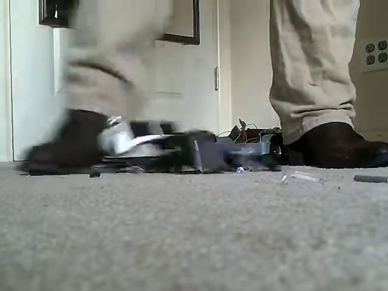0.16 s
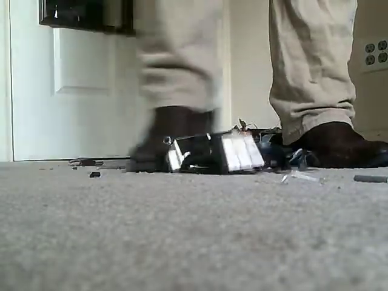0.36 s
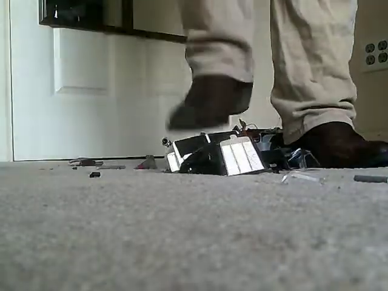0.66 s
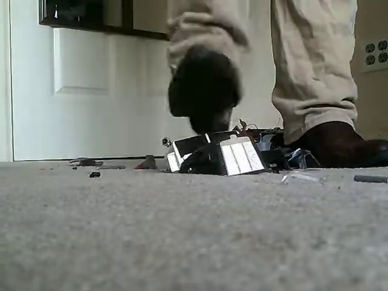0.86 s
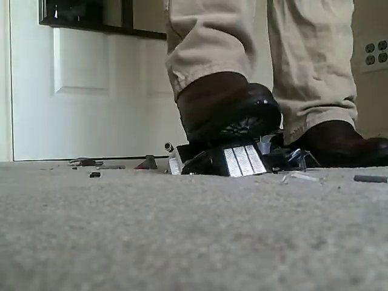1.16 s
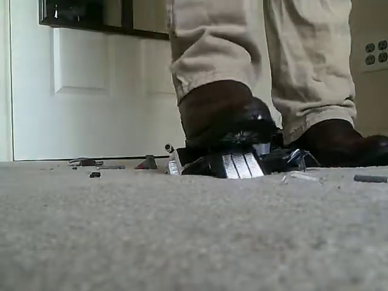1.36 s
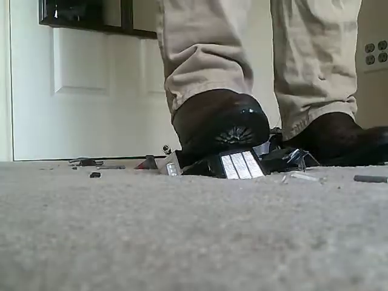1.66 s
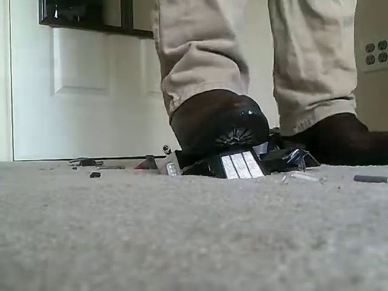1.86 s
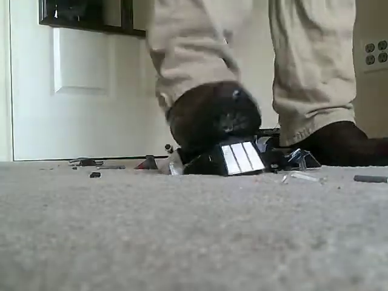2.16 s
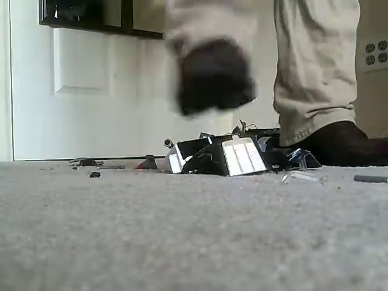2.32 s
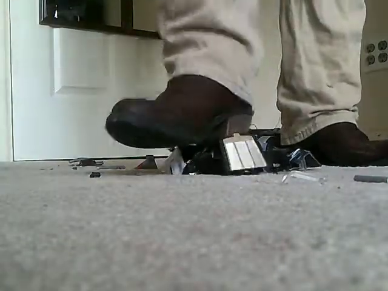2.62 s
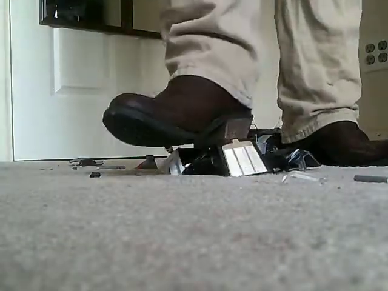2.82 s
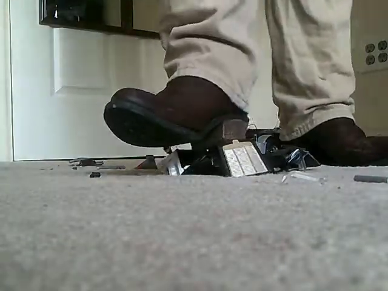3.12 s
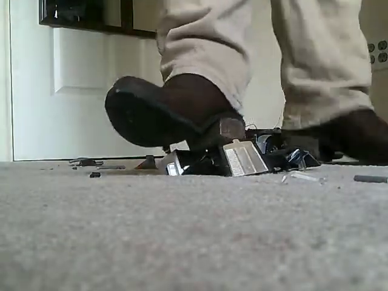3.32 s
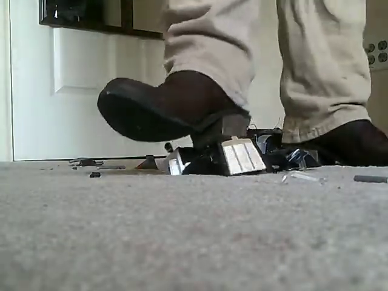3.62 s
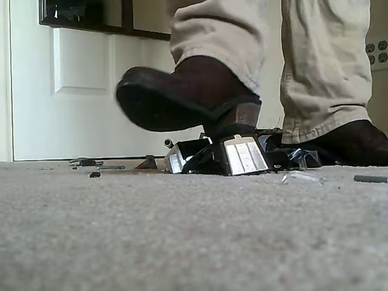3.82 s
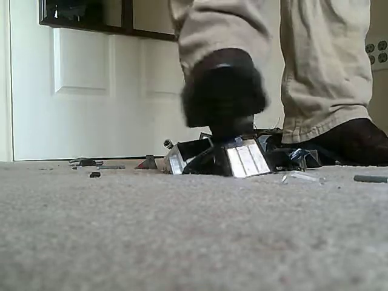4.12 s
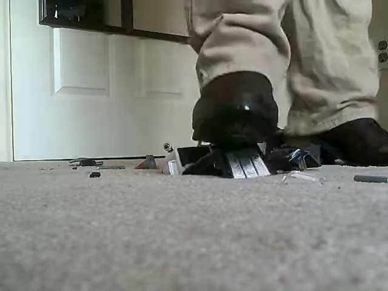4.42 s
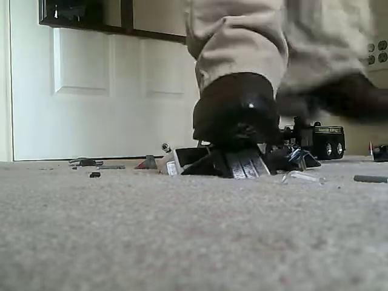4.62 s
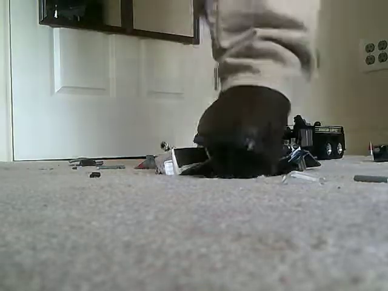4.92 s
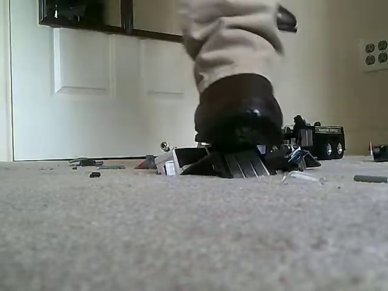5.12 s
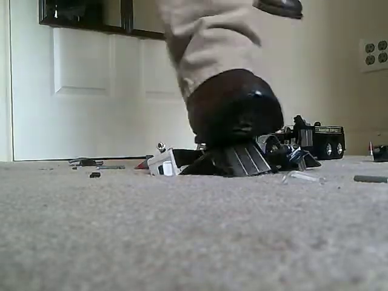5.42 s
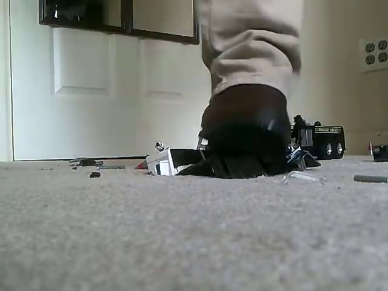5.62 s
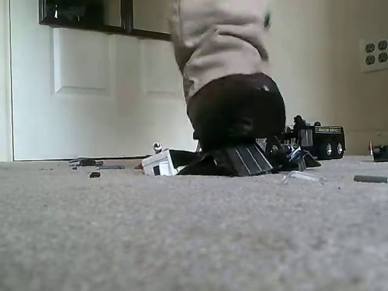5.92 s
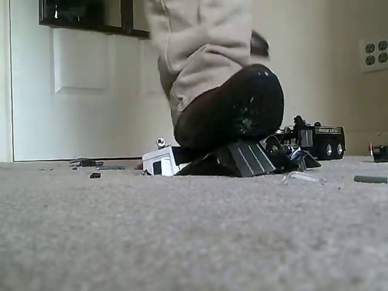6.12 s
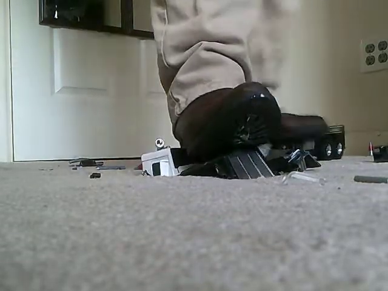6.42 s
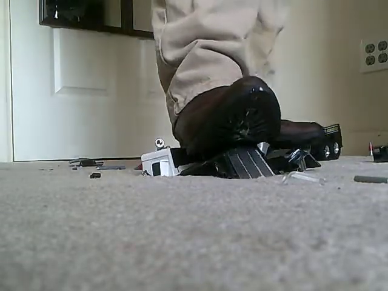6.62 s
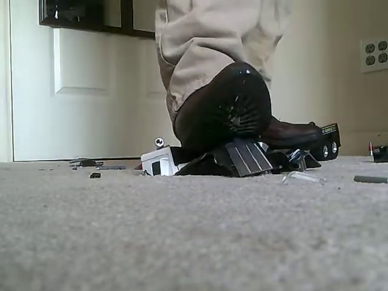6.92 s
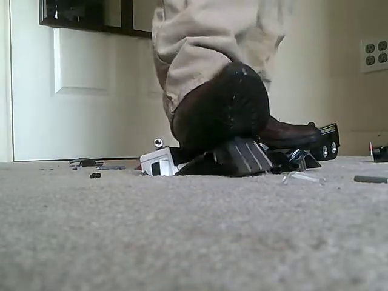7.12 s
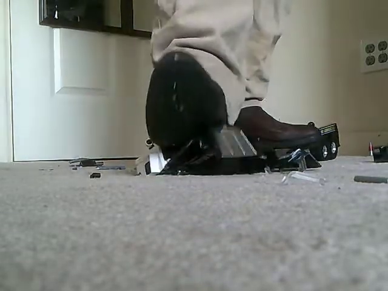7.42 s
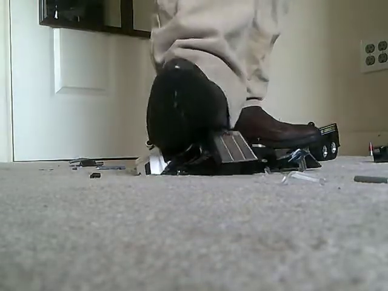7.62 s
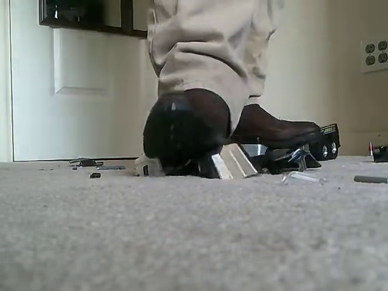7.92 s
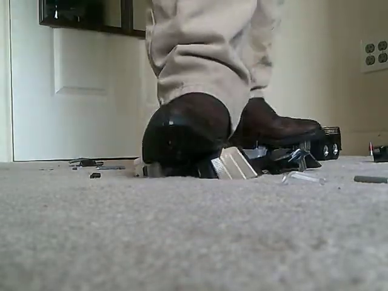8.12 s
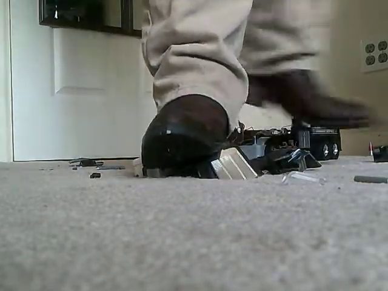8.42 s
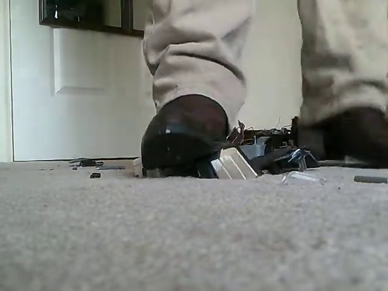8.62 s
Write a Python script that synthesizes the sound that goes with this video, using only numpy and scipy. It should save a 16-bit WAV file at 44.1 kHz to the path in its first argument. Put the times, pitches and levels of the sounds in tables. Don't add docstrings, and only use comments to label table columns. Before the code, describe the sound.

A hollow plastic toy is shoved and crushed under a boot on carpet in a small damped room. Clatter and snaps come first, then a hard stamp, sparse creaky clicks, and a violent, distorted crunching smash about two thirds through. Smaller cracks follow and thin out. A low fan and mains hum runs throughout. The cheap microphone lies close on the floor, boomy and dull on top.

```python
import sys
import numpy as np
from scipy import signal
from scipy.fft import rfft, irfft
from scipy.io import wavfile
from scipy.ndimage import uniform_filter1d

SR = 44100
rng = np.random.default_rng(int(sys.argv[2]) if len(sys.argv) > 2 else 0)


def makeup_ratio(level_db):
    decades = np.asarray(level_db, float) / 20
    return 10 ** decades


def dump_mix(stems):
    frames = np.atleast_2d(stems).T
    limited = np.clip(frames, -1, 1)
    pcm = np.round(limited * 32767).astype(np.int16)
    wavfile.write(sys.argv[1], SR, pcm)


N = 386316
TIME = np.arange(N) / SR


def noise(count=N + SR):
    return rng.standard_normal(count)


def colour(x, points):
    hz, db = np.transpose(points)
    size = 8192
    grid = np.maximum(np.fft.rfftfreq(size, 1 / SR), 1)
    ceps = irfft(np.interp(np.log(grid), np.log(hz), db) * np.log(10) / 20)
    ceps[1:size // 2] *= 2
    ceps[size // 2 + 1:] = 0
    impulse = irfft(np.exp(rfft(ceps)))
    return signal.fftconvolve(x, impulse)[:len(x)]


def band(x, lo_hz, hi_hz):
    y = signal.sosfilt(signal.butter(2, [lo_hz, hi_hz], "band", fs=SR, output="sos"), x)
    return y / np.sqrt(np.mean(y ** 2))


def walk(rate_hz):
    k = int(SR / rate_hz)
    held = np.repeat(noise(N // k + 1), k)
    return uniform_filter1d(uniform_filter1d(held, k), k)[:N]


def fade(t, t60_s):
    return np.exp(-np.log(1000) * t / max(t60_s, .003))


def onset(t, rise_s):
    return 1 - np.exp(-t / rise_s)


def modes(hz, db, t, phase=0):
    return makeup_ratio(db) @ np.sin(2 * np.pi * np.outer(hz, t) + phase)


def swell(s, db, rise_s, fall_s):
    corners_s = [s - 3 * max(rise_s, .002), s, s + 3 * max(fall_s, .002)]
    return makeup_ratio(np.interp(TIME, corners_s, [db - 90, db, db - 90]))


def add_at(out, s, sound):
    i = int(s * SR)
    out[i:i + len(sound)] += sound


# start_s, level_db, pitch_hz, crack_db (against the peak), t60_s
SNAPS = [(0.319, -14.5, 1055, -31, 0.032), (1.18, -9, 1020, -33, 0.021), (1.474, -11, 733, -8, 0.039),
         (2.107, -10.5, 784, -28, 0.057), (2.539, -22.5, 525, -37, 0.076), (3.493, -22, 353, -49, 0.021),
         (4.111, -29.5, 930, -24, 0.034), (4.793, -23, 696, -41, 0.019), (4.805, -15, 957, -52, 0.018),
         (5.514, -15, 1010, -31.5, 0.087), (6.419, -20, 863, -36, 0.035), (7.937, -23, 947, -40, 0.087),
         (8.174, -34, 625, -44.5, 0.028)]
CRACKS = [(0.207, -20, 834, -28, 0.12), (1.31, -18, 837, -28.5, 0.015), (4.227, -33, 810, -20, 0.033),
          (4.259, -18, 716, -44, 0.015), (4.328, -29.5, 1045, -30, 0.04), (4.833, -21, 764, -54, 0.083),
          (5.561, -31, 1100, -7.5, 0.094), (5.964, -4, 941, -4.5, 0.14), (5.974, 10, 831, -14, 0.024),
          (5.985, 0.5, 731, -8, 0.028), (5.997, 3, 739, -14.5, 0.066), (6.653, -13, 735, -31, 0.048),
          (7.977, -15, 658, -49.5, 0.059)]
KNOCKS = [(0.057, -20.5, 1177, -24, 0.17), (0.182, -26.5, 764, -27, 0.37), (0.25, -19, 800, -14, 0.1),
          (0.301, -21, 974, -13, 0.047), (0.917, -19.5, 996, -24, 0.12), (1.463, 2.5, 880, -14.5, 0.047),
          (3.689, -20, 893, -43, 0.019), (5.352, -18.5, 775, -25, 0.03), (5.676, 2, 848, -24.5, 0.023),
          (6.009, -7, 1106, -9.5, 0.045), (6.031, -8, 473, -12.5, 0.045), (6.339, -23, 806, -30, 0.1),
          (6.351, -16, 1230, -27, 0.088), (6.368, -2.5, 1024, -21, 0.061), (6.389, -5.5, 975, -18.5, 0.028),
          (6.464, -9, 920, -34, 0.06), (6.474, -12, 762, -35, 0.057), (6.529, -21, 576, -28, 0.2),
          (6.688, -15, 650, -62, 0.054), (6.713, -20, 700, -25, 0.079), (6.955, -32, 1000, -32.5, 0.15),
          (7.084, -33.5, 299, -51.5, 0.041), (7.146, -24, 705, -37, 0.055), (8.049, -27, 746, -42, 0.066)]
CLATTER = [(0.042, -17, 973, -19.5, 0.064), (0.28, -19, 1140, -25, 0.078), (0.431, -33, 945, -26, 0.067),
           (0.979, -11.5, 435, -29, 0.023), (1.282, -26, 895, -37, 0.02), (1.29, -33, 766, -10.5, 0.095),
           (1.939, -30.5, 770, -31, 0.082), (2.129, -2, 923, -34.5, 0.019),
           (2.156, -20.5, 414, -19.5, 0.088), (2.216, -28, 856, -19, 0.023), (2.59, -22.5, 700, -29, 0.037),
           (3.657, -21, 310, -47.5, 0.027), (4.185, -31, 720, -35, 0.083), (4.928, -19.5, 840, -35, 0.036),
           (5.063, -6.5, 920, -24, 0.015), (5.141, -8.5, 795, -23, 0.073), (5.323, -15.5, 493, -36, 0.025),
           (5.893, -15.5, 418, -37, 0.042), (5.921, -9, 950, -19, 0.042), (5.945, 3, 1020, -12.5, 0.095),
           (6.62, -14, 955, -18.5, 0.041), (6.774, -23.5, 520, -15.5, 0.066),
           (7.249, -11.5, 897, -15.5, 0.039), (8.757, -19.5, 915, -30.5, 0.13)]


def breaks():
    kinds = [(SNAPS, 0.15), (CRACKS, 0.32), (KNOCKS, 0.41), (CLATTER, 0.5)]
    events = sorted(tuple(row) + (spread,) for rows, spread in kinds for row in rows)
    shell_fall_db = 16
    out, t = np.zeros(N + SR), np.arange(SR // 6) / SR
    hiss = noise()
    crack_low, crack_top = band(hiss, 1500, 4600), band(hiss, 4500, 8000)
    body_noise = band(noise(), 280, 2000)
    rattle = makeup_ratio(3 * np.tanh(band(noise(), 40, 200)))
    grit = band(noise(), 1300, 4300) * rattle ** 2
    place = np.linspace(-1, 1, 13)
    lucks = rng.standard_normal((len(events), 3, 13))
    for (s, db, hz, crack_db, t60_s, spread), luck in zip(events, lucks):
        now = slice(int(s * SR), int(s * SR) + len(t))
        spread = np.clip(2.2 * spread ** 2 + max(db + 2, 0) / 20, .05, .9)
        pitch_hz = hz * np.exp(spread * (place + 0.063 * luck[0] * (place != 0)))
        mode_db = 3.3 * luck[1] - shell_fall_db * np.abs(place)
        ring = 0.42 * modes(pitch_hz, mode_db, t * (1 + 0.53 * t), 2 * luck[2, :, None])
        body = (0.064 + 0.64 * spread) * body_noise[now]
        ring = (ring + body) * rattle[now] * fade(t, t60_s) * onset(t, 0.0011)
        flaps = modes(2500 * np.exp(0.24 * luck[2]), luck[1], t, 2 * luck[0, :, None])
        flaps *= fade(t, 0.015) * onset(t, 0.00073)
        split = 0.2 * crack_low[now] + makeup_ratio(0.16 * db - 0.5) * crack_top[now]
        split *= 0.73 * (1.1 * fade(t, 0.004) + 0.22 * fade(t, t60_s))
        crack = (split + 0.76 * grit[now] * fade(t, 0.95 * t60_s)) * onset(t, 0.00052)
        out[now] += makeup_ratio(db) * (ring + makeup_ratio(crack_db + 13.5) * (crack + 0.49 * flaps))
    return out[:N]


# start_s, level_db, pitch_hz, t60_s
CHIPS = [(0.0417, -20.5, 1970, 0.037), (0.0464, -22.5, 2320, 0.049), (0.0614, -24, 1970, 0.043),
         (0.0774, -29, 1970, 0.044), (0.1444, -47, 2010, 0.04), (0.174, -40, 2380, 0.04),
         (0.2117, -26, 2470, 0.04), (0.2487, -20, 2930, 0.04), (0.2545, -35, 2440, 0.037),
         (0.2784, -18.5, 2310, 0.045), (0.3003, -22, 2900, 0.04), (0.3074, -26, 2400, 0.04),
         (0.916, -29, 2750, 0.04), (0.9195, -26, 2420, 0.044), (0.9566, -36, 2950, 0.035),
         (0.979, -25, 2340, 0.046), (1.0094, -50, 2330, 0.04), (1.29, -51, 1900, 0.04),
         (1.29, -39, 1900, 0.034), (1.3114, -47, 1900, 0.04), (1.3513, -49, 2390, 0.037),
         (1.4626, -8, 2797, 0.025), (1.4837, -22, 2440, 0.036), (1.941, -40, 2000, 0.049),
         (2.1107, -26, 2680, 0.035), (2.1296, -20, 2350, 0.04), (2.1568, -24, 2240, 0.045),
         (2.2134, -36, 2010, 0.04), (2.271, -43, 2060, 0.054), (2.5443, -30, 1900, 0.033),
         (2.5628, -33, 2280, 0.045), (2.5774, -42, 2290, 0.036), (2.5905, -33, 2320, 0.043),
         (2.6723, -46, 1930, 0.04), (3.654, -49, 2290, 0.04), (3.691, -42, 1900, 0.04),
         (4.1075, -44, 2060, 0.05), (4.1584, -54, 1980, 0.04), (4.1839, -45, 1950, 0.044),
         (4.2044, -47, 2060, 0.04), (4.2602, -47, 2010, 0.04), (4.2747, -37, 2040, 0.032)]
LATE_CHIPS = [(4.8534, -46, 1600, 0.04), (4.9265, -31.5, 1600, 0.046), (5.0627, -21, 1900, 0.04),
              (5.0774, -32, 1900, 0.04), (5.1554, -27, 1870, 0.044), (5.3226, -33.5, 1606, 0.025),
              (5.3528, -34.5, 1810, 0.033), (5.369, -48, 1600, 0.04), (5.5294, -35.5, 1680, 0.04),
              (5.5608, -36, 2300, 0.026), (5.5744, -44, 2390, 0.04), (5.689, -20, 1880, 0.032),
              (5.893, -36, 1875, 0.04), (5.9199, -15, 1624, 0.046), (6.37, -10, 2750, 0.038),
              (6.3858, -11, 1700, 0.04), (6.4017, -20, 1720, 0.04), (6.4194, -34, 1620, 0.04),
              (6.4566, -20, 1770, 0.045), (6.4649, -13.5, 1780, 0.045), (6.485, -19, 1620, 0.053),
              (6.5287, -24, 1620, 0.052), (6.6334, -28, 2030, 0.049), (6.687, -32, 1910, 0.04),
              (6.7116, -31, 1910, 0.04), (6.772, -29.5, 1720, 0.048), (6.7852, -39, 1730, 0.04),
              (6.9551, -44, 1590, 0.051), (6.9684, -42, 1610, 0.045), (7.1457, -44, 1600, 0.038),
              (7.1886, -47, 1600, 0.048), (7.2489, -19, 1870, 0.02), (7.264, -39, 2020, 0.035),
              (7.9374, -30.5, 1960, 0.03), (7.9543, -35, 1910, 0.017), (8.0247, -44, 1910, 0.04),
              (8.0423, -41, 1700, 0.031), (8.083, -50, 1810, 0.04), (8.1055, -53, 1780, 0.036),
              (8.1718, -51, 1790, 0.04), (8.2295, -50, 1710, 0.04)]


def chips():
    level_db, tilt_db, fall_db = -4.5, 5, 12.5
    out, t = np.zeros(N + SR), np.arange(SR // 8) / SR
    rows = list(CHIPS) + list(LATE_CHIPS)
    rattle = makeup_ratio(3 * np.tanh(band(noise(), 60, 300)))
    for (s, db, hz, t60_s), luck in zip(rows, rng.standard_normal((len(rows), 3, 16))):
        now = slice(int(s * SR), int(s * SR) + len(t))
        pitch_hz = np.geomspace(1100, 4700, num=16) * np.exp(.04 * luck[0])
        mode_db = db + level_db + tilt_db * np.log2(pitch_hz / 1500) + 3.3 * luck[1]
        mode_db -= fall_db * np.abs(np.log2(pitch_hz / hz))
        ring = modes(pitch_hz, mode_db, t, 2 * luck[2, :, None]) * rattle[now]
        out[now] += ring * fade(t, t60_s) * onset(t, 0.0012)
    return out[:N]


# start_s,
# level_db, pitch_hz, t60_s
PANELS = [(.043, -25.5, 372, 0.058), (0.209, -22, 2496, 0.071), (0.433, -38, 980, 0.18),
          (.979, -23, 490, 0.019), (1.18, -29, 513, 0.054), (1.282, -30.5, 800, 0.013),
          (1.464, -8.5, 810, 0.038), (1.47, -14.5, 390, 0.039), (2.110, -21.5, 786, .04),
          (2.54, -26.5, 720, 0.024), (5.063, -26, 525, 0.027), (5.142, -18, 560, 0.046),
          (5.142, -17.5, 1075, 0.15), (5.142, -12, 3130, 0.013), (5.515, -19.5, 510, 0.042),
          (5.515, -25, 1041, 0.16), (5.514, -19.5, 3070, 0.013), (5.677, -9.5, 1000, 0.14),
          (5.677, -19.5, 477, 0.033), (6.37, -5, 2720, 0.031), (6.369, -4.5, 918, 0.092),
          (6.625, -33, 2160, 0.3), (6.69, -33, 2110, 0.22), (7.083, -26.5, 400, 0.015),
          (7.146, -27.5, 865, .025), (7.158, -31, 1050, .05), (7.262, -25.5, 1055, 0.045),
          (7.31, -43, 2900, .12), (6.622, -21, 1142, 0.058), (6.374, -10, 798, 0.076),
          (6.635, -31, 2560, .15), (.312, -21.5, 1086, .04), (.93, -30, 1700, 0.071), (.92, -29, 4000, .06),
          (2.133, -20.5, 1484, 0.055), (7.94, -27, 1970, 0.13), (7.938, -29, 548, 0.06),
          (7.938, -34, 1375, 0.07), (8.757, -28, 300, 0.039)]


def panels():
    out, t = np.zeros(N + SR), np.arange(SR // 4) / SR
    stiffening = t * (1 + 0.29 * t)
    for s, db, hz, t60_s in PANELS:
        ring = modes(hz * np.array([.94, 1, 1.075]), db + np.array([-4, 0.5, -5]), stiffening)
        add_at(out, s, ring * fade(t, t60_s))
    return out[:N]


# peak_s, level_db, rise_s, fall_s, brightness_db
CRUNCH = [(.044, -22.5, 0.011, 0.25, 4), (.315, -22.5, 0.21, 0.14, 2.5), (.925, -31.5, 0.013, 0.12, 6.5),
          (1.188, -23, 0.028, 0.052, -20.5), (1.295, -32.5, .012, 0.15, -0.5),
          (2.135, -27.5, 0.004, 0.1, -11), (2.21, -24.5, 0.042, 0.091, -25),
          (2.544, -25.5, 0.014, 0.14, -1.5), (3.656, -32.5, .012, 0.31, -3),
          (4.288, -30.5, 0.14, .026, -18.5), (4.85, -31, 0.45, 0.044, -17),
          (4.934, -24, 0.032, 0.014, -20.5), (5.327, -25, 0.051, 0.16, -9), (5.53, -24.5, .005, 0.16, -27),
          (5.99, -8.5, 0.1, 0.1, -11.5), (6.099, -26.5, 0.066, 0.2, 6.5), (6.374, -3, 0.017, 0.17, -31),
          (6.48, -14.5, 0.15, 0.16, -13), (6.624, -17.5, .008, 0.16, -7),
          (7.149, -23.5, 0.0075, 0.1, -16.5), (7.25, -9.5, 0.011, 0.03, -19.5),
          (7.97, -13.5, 0.053, 0.077, -29), (8.101, -27, 0.14, 0.038, -21.5),
          (8.181, -27, 0.01, 0.1, -20.5)]


def crunch():
    slipping = rng.random(N) < 1200 / SR
    slip_db = 4.0 * np.minimum(rng.exponential(size=N), 2.4)
    slips = slipping * makeup_ratio(slip_db) * np.sign(noise(N))
    body = 0.96 * band(slips, 620, 1050) + 0.35 * band(slips, 900, 1250) + 0.61 * band(slips, 400, 2000)
    edge = band(slips, 1400, 2900) + 0.59 * band(slips, 1800, 4200) + .25 * band(slips, 3100, 9000)
    push, bright = np.zeros(N), np.zeros(N)
    for s, db, rise_s, fall_s, edge_db in CRUNCH:
        press = swell(s, db - 11.0, rise_s, fall_s)
        push += press
        bright += press * makeup_ratio(edge_db - 3.5)
    return push * body + bright * edge


# start_s, level_db, pitch_hz, t60_s
THUDS = [(0.041, -35, 109, 0.045), (0.301, -16, 320, 0.012), (0.977, -19.5, 209, 0.052),
         (1.18, -30.5, 193, 0.13), (1.462, -22.5, 80.8, 0.067), (1.464, -6, 206.5, 0.04),
         (1.476, -1.5, 188, 0.013), (2.128, -12, 177, 0.031), (2.541, -34, 72.7, 0.07),
         (3.496, -27, 110, 0.082), (5.141, -39, 143, 0.05), (5.323, -27, 153, 0.067),
         (5.513, -32, 108.4, 0.077), (5.677, -26.5, 195, 0.031), (5.897, -21, 89.9, 0.07),
         (5.92, -21, 79, 0.079), (5.964, 7, 113.7, 0.034), (6.026, -8.5, 112.8, 0.077),
         (6.058, -11.5, 73.6, 0.082), (6.364, -20.5, 292, 0.043), (6.681, -27, 73, 0.061),
         (6.712, -34, 92.7, 0.032), (6.774, -22.5, 198, 0.14), (7.081, -25.5, 101.5, 0.033),
         (7.247, -14, 159, 0.037)]


def thuds():
    out, t = np.zeros(N + SR), np.arange(SR // 3) / SR
    for s, db, hz, t60_s in THUDS:
        add_at(out, s, modes(hz * np.array([1, 1.6]), np.array([db, db - 8.5]), t) * fade(t, t60_s))
    return out[:N]


# start_s, level_db, pitch_hz
TICKS = [(0.175, -30, 2430), (0.5184, -43, 2440), (0.9542, -33, 2900), (1.353, -43, 2410),
         (1.4301, -44, 2750), (2.563, -30.5, 2490), (2.576, -35, 2350), (4.277, -38, 2140),
         (4.31, -42, 2920), (1.076, -38.5, 960), (3.765, -45, 2500), (6.736, -30, 2480), (7.32, -47, 2880),
         (7.3682, -51, 2560), (7.7742, -48, 3460), (7.8144, -39.5, 2170)]


def ticks():
    out, t = np.zeros(N + SR), np.arange(SR // 3) / SR
    for s, db, hz in TICKS:
        add_at(out, s, modes(hz * np.array([.8, 1, 1.3]), db + np.array([2, 6, 2]), t) * fade(t, 0.015))
    return out[:N]


def room():
    t = np.arange(SR // 2) / SR
    tail = band(noise(len(t)), 140, 21000) * fade(t, 0.24)
    tail += 0.42 * band(noise(len(t)), 64, 360) * fade(t, 0.13)
    tail *= np.clip((t - .004) / 0.0035, 0, 1)
    return makeup_ratio(-8) * tail / np.sqrt(np.sum(tail ** 2))


# frequency_hz, gain_db
MIC = [
    (20, 4.5),
    (1200, 0),
    (2500, -11.5),
    (4000, -19.5),
    (5200, -26.5),
    (7200, -12.5),
    (8600, -30),
    (10000, -56.5),
    (20000, -56.5),
]


def microphone(sound):
    return colour(sound, MIC)


# start_s, level_db, pitch_hz, t60_s
SWINGS = [
    (1.468, -16.5, 39.6, 0.14),
    (1.533, -14.5, 35, 0.14),
    (2.133, -17, 40.4, 0.1),
    (3.344, -22, 27.6, 0.15),
    (5.9445, 5, 47.5, 0.2),
    (5.968, -7.5, 27.92, .15),
    (6.022, -15, 31.03, 0.38),
    (7.262, -23, 36, 0.08),
]


def swings():
    out, t = np.zeros(N + SR), np.arange(SR // 2) / SR
    for s, db, hz, t60_s in SWINGS:
        add_at(out, s, makeup_ratio(db) * np.sin(2 * np.pi * hz * t) * fade(t, t60_s))
    return out[:N]


# peak_s, level_db, rise_s, fall_s
WEIGHT = [(1.0, -30, 0.37, .15), (1.49, -26.5, 0.076, 0.19), (1.63, -30, .3, 0.28),
          (2.16, -9, 0.091, 0.046), (3.34, -31.5, 0.35, 0.13), (4.8, -17, 0.33, 0.24),
          (5.12, -25.5, 0.11, .9), (5.51, -26, 0.24, 0.48), (6.0, 4, 0.16, 0.068),
          (6.15, -22.5, 0.37, 0.62), (6.69, -26.5, 0.18, 0.31), (7.95, -45, 1, 0.41), ]


def boards():
    standing_db, limit_db = -54, -23
    load = makeup_ratio(standing_db) + sum(swell(*row) for row in WEIGHT)
    return np.minimum(load, makeup_ratio(limit_db)) * band(noise(N), 4.9, 28)


# time_s, level_db
SHAFT = [(0.0, -32.5), (2.56, -30.5), (3.12, -33), (3.95, -31), (4.98, -30.5), (5.37, -33.5), (6.8, -34),
         (7.15, -30), (8.03, -35.5), (8.76, -31.5)]
# frequency_hz, level_db (rms)
HUM = [
    (26.9, -31),
    (59.2, -44),
    (118.4, -43),
    (145.3, -53),
    (231.5, -55),
    (317.6, -54),
]


def hum():
    shaft_db = np.interp(TIME, *np.transpose(SHAFT)) + 0.49 * walk(0.77)
    out = np.sqrt(2) * makeup_ratio(shaft_db) * np.sin(2 * np.pi * HUM[0][0] * TIME + 0.46 * walk(4.8))
    for hz, db in HUM[1:]:
        line = np.sin(2 * np.pi * hz * TIME + .5 * walk(0.67))
        out += np.sqrt(2) * makeup_ratio(db + 2.9 * walk(3.6)) * line
    return out


# frequency_hz, density_db (per Hz)
AIR = [(32, -32.5), (55, -9), (76, -7.5), (129, -14), (186, -11.5), (330, -12), (391, -15.5), (495, -15.5),
       (612, -18), (1020, -20), (1410, -31), (2970, -46.5), (4750, -67.5), (7120, -55.5), (9000, -73),
       (11700, -111), (19800, -120)]


def fan_air():
    flow = colour(noise(), AIR)[SR:]
    flow /= np.std(signal.sosfilt(signal.butter(4, 130, "high", fs=SR, output="sos"), flow))
    return makeup_ratio(-41.5 + 2.5 * walk(2.363) + 0.26 * walk(17)) * flow


def scene():
    toy = breaks() + chips() + panels() + crunch() + thuds() + ticks()
    reflected = signal.fftconvolve(toy, room())[:N]
    behind = swings() + boards() + hum() + fan_air()
    return (microphone(toy + reflected) + behind)[None]


def top_cut(x):
    return signal.sosfilt(signal.butter(12, 16500, fs=SR, output="sos"), x)


def record(dry):
    limit, knee = .72, 12
    clipped = dry / (1 + np.abs(dry / limit) ** knee) ** (1 / knee)
    mix = colour(clipped[0], [(8500, 0), (12000, -8)])[None]
    return top_cut(mix)


dry = scene()
out = record(dry)
dump_mix(out)
```